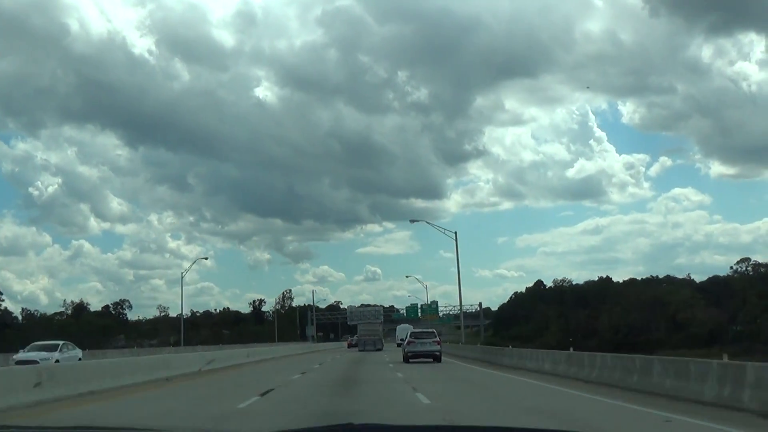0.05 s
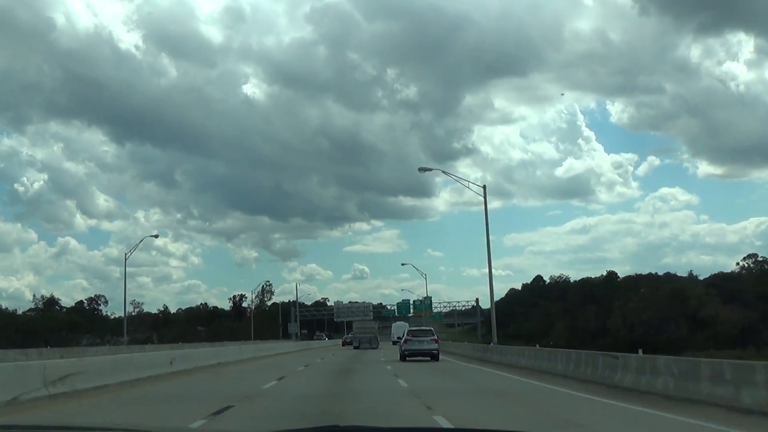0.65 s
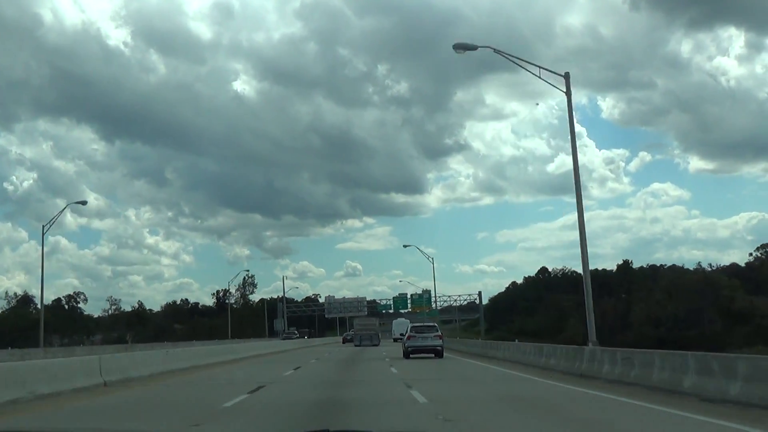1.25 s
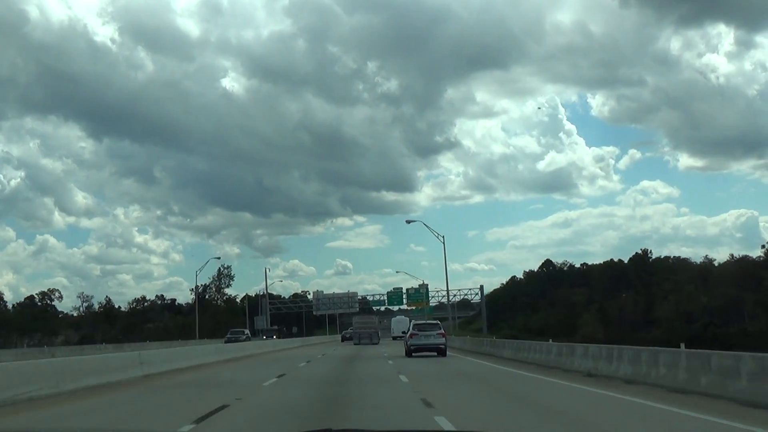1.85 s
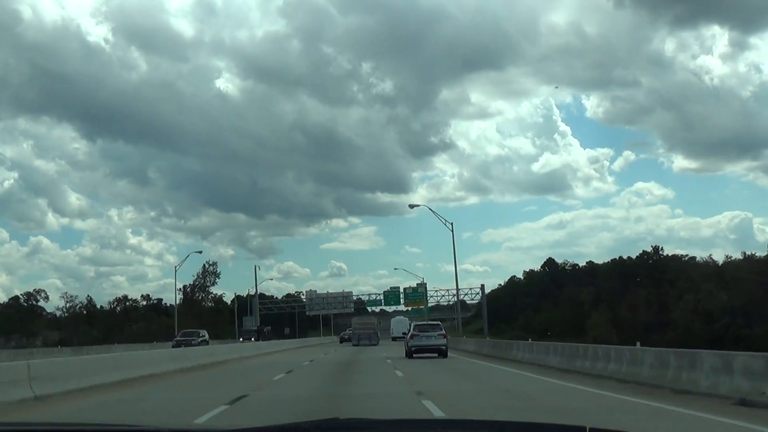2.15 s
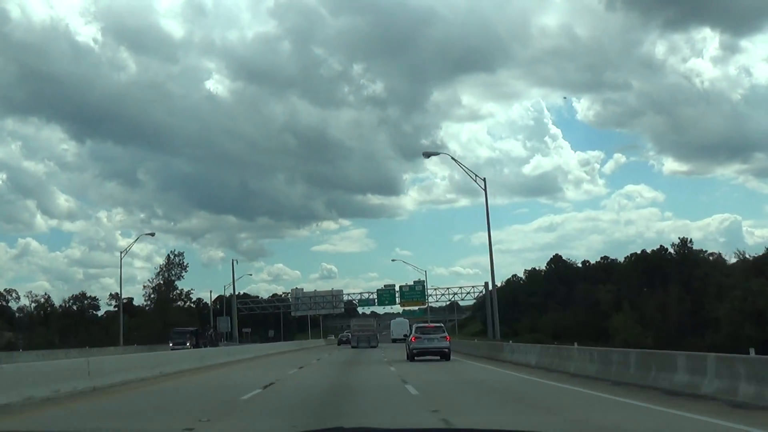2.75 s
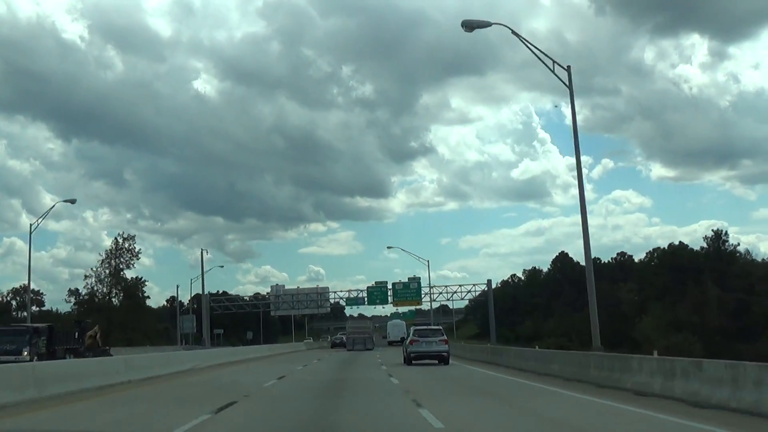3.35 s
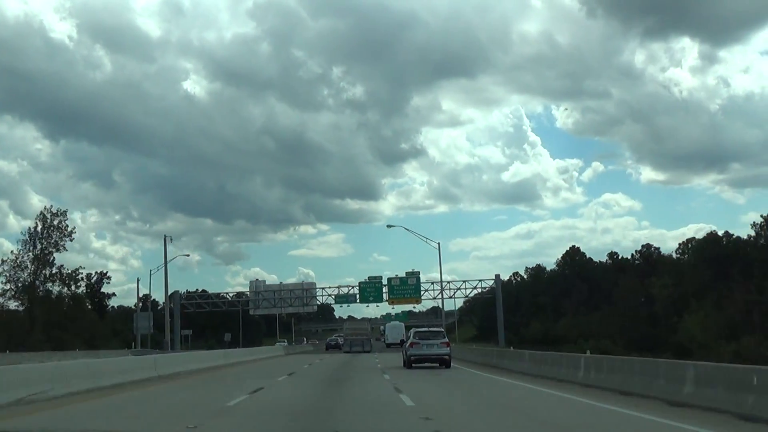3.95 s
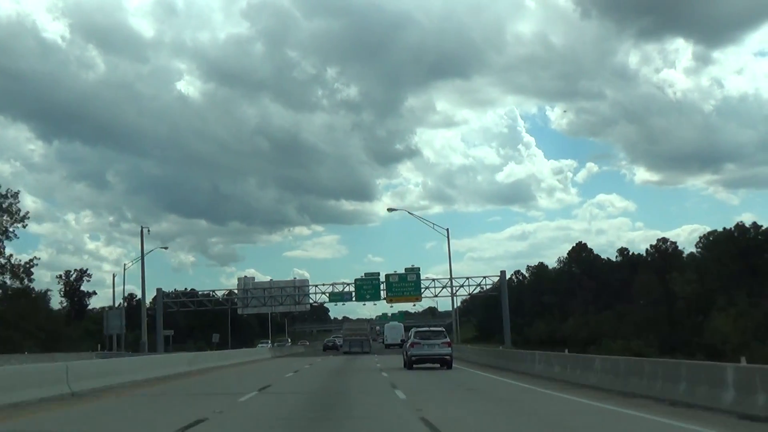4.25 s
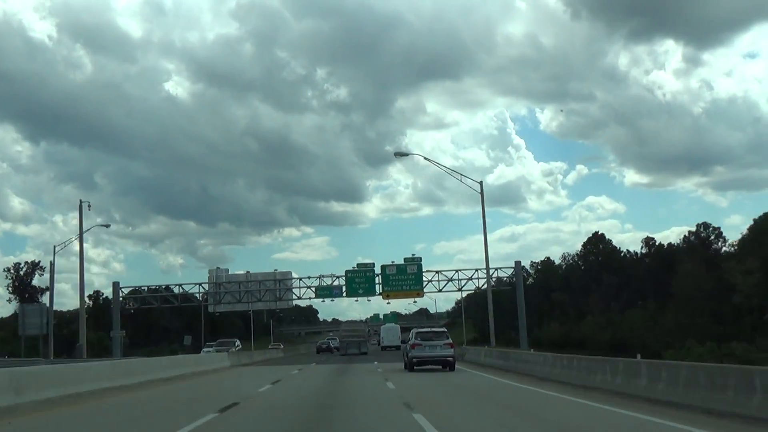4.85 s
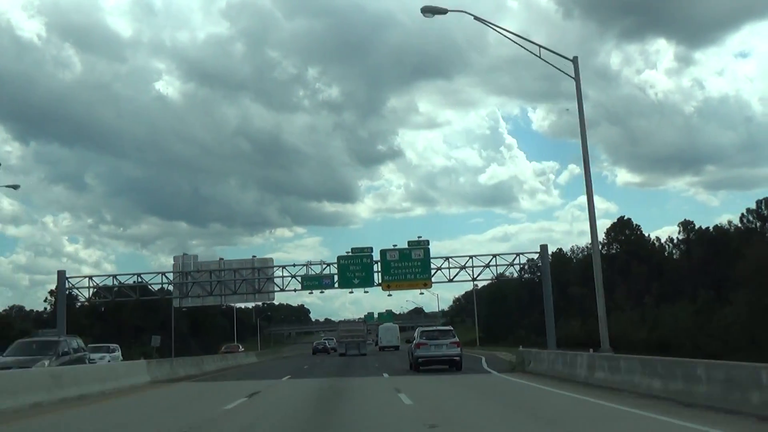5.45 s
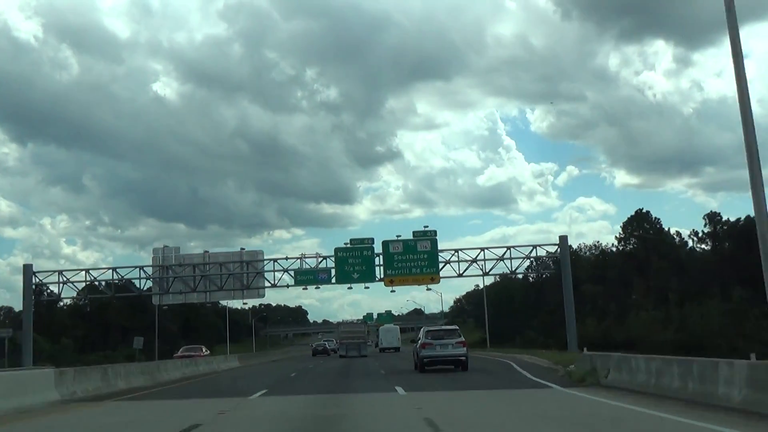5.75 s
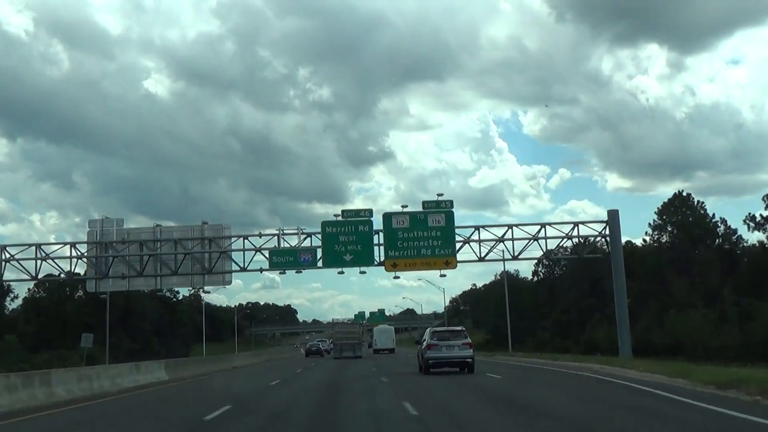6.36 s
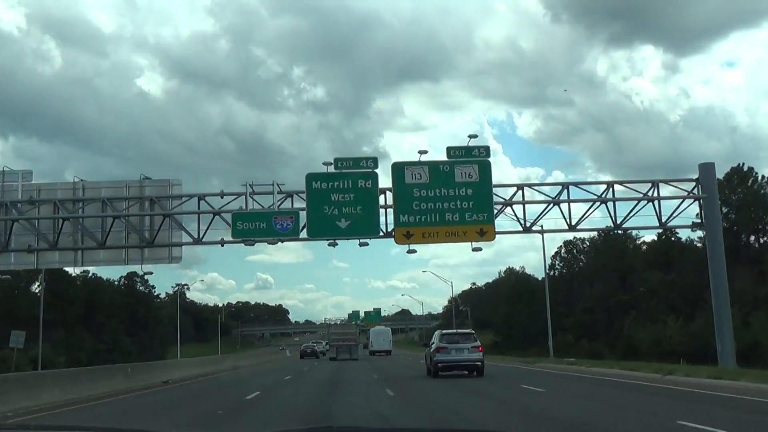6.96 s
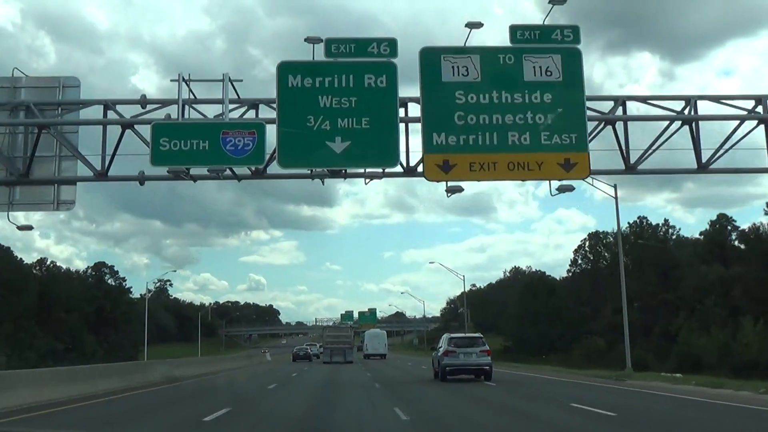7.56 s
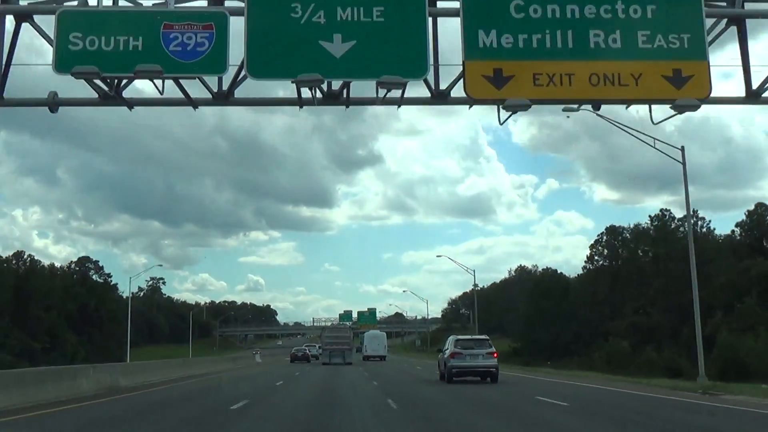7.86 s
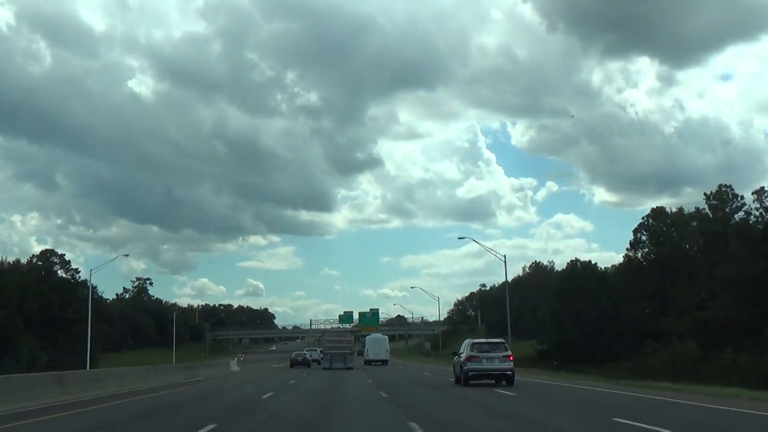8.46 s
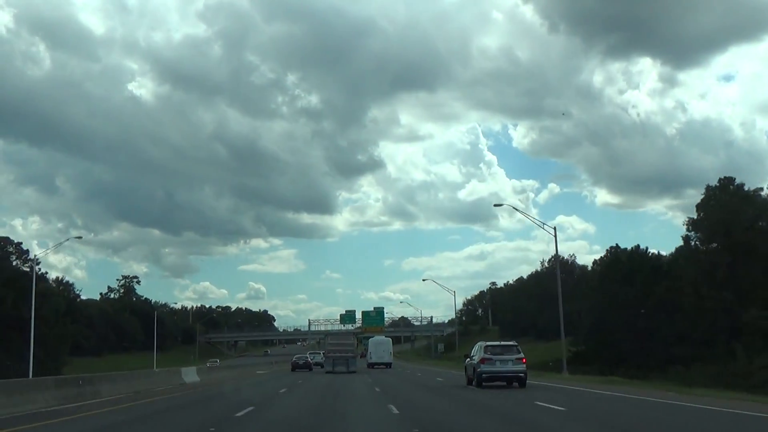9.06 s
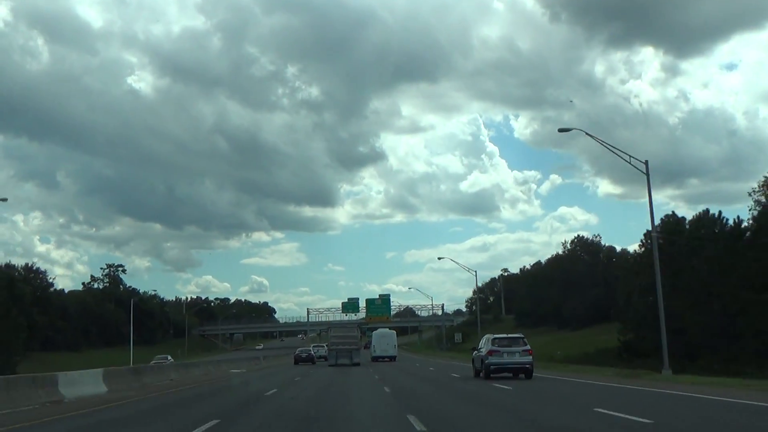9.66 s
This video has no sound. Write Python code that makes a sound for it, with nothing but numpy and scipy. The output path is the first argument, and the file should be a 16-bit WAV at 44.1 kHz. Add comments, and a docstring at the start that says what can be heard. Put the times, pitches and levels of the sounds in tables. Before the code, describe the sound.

Inside a fast-moving car, tyres sing on concrete, bump over joints, then roar lower on asphalt while loose plastic ticks lightly.

```python
"""Inside a car at highway speed

The road shakes the body into a low boom and rumble. The tyres sing on concrete, slap over its joints,
then roll onto asphalt, which roars lower and duller. The air inside them rings in swells. A faint
drivetrain whine climbs as the car pulls, air hisses past the glass, and loose trim rustles and ticks."""
import sys
import numpy as np
from scipy import signal
from scipy.fft import rfft, irfft, next_fast_len
from scipy.io import wavfile
from scipy.ndimage import uniform_filter1d

SR = 44100
rng = np.random.default_rng(int(sys.argv[2]) if len(sys.argv) > 2 else 0)


def to_wav(s):
    """Save 16-bit WAV."""
    ch = np.atleast_2d(s).T  # columns
    pcm = np.round(np.clip(ch, -1, 1) * 32767)  # PCM
    wavfile.write(sys.argv[1], SR, pcm.astype(np.int16))


N = 427769
T = np.arange(N) / SR
FFT_SIZE = next_fast_len(N + 8192, real=True)
HZ = np.maximum(np.arange(FFT_SIZE // 2 + 1) * SR / FFT_SIZE, 1)
AXLE_LAG_S, CROSSING_S = 0.1, 0.025   # rear wheels' delay; time for an axle to change surface
FRONT_SHARE = 0.82   # of the road noise's power

# Tone colour of each road surface: freq_hz, level_db
CONCRETE_COLOUR = [(18, -3), (35, -12), (100, -4.5), (200, -11.5), (300, -10), (370, -14.5), (800, -15.5),
                   (1300, -24), (1750, -26.5), (2300, -37.5), (3500, -46), (5000, -54.5), (10000, -60),
                   (15500, -64.5)]
ASPHALT_COLOUR = [(18, -14), (35, -4), (100, 1.5), (200, -8.5), (300, -4.5), (370, -18.5), (800, -20.5),
                  (1300, -37), (1750, -41.5), (2300, -43.5), (3500, -51), (5000, -56), (10000, -60.5),
                  (15500, -63.5)]
# Resonances of cabin air, tyre cavity and panels: centre_hz, width_hz, lift_db
CABIN_RESONANCES = [(64.3, 19, 6.5), (122, 54, 5.5), (143.6, 16, 5.5), (183.6, 27.5, 9), (231.8, 74, 9.5),
                    (303.7, 21.4, 4), (421, 33, 4.5), (469.4, 32, 4.5), (568, 60, 4), (751, 20, 4),
                    (855, 23, 3.5), (1070, 57, 3), (1288, 120, 8), (3990, 300, 3.5)]
# The mix on concrete, grooved concrete, then asphalt:
# start_s, boom_db, rumble_db, roar_db, sing_db, hiss_db, groove_db
ROAD_STRETCHES = [(0, -23.5, -20.5, -29, -34.2, -46, -38.5), (5.0, -24, -20.5, -28, -33, -47, -31.5),
                  (6.5, -24.5, -17, -23, -38.7, -54, -68)]
# Undulations that load (+) or ease (-) the suspension: middle_s, length_s, boom_lift_db, rumble_lift_db
ROAD_BUMPS = [(.73, 0.19, 1, 5), (1.05, 0.49, 2.5, 2.5), (1.38, 0.24, 6, 0), (1.54, .2, 1, 3),
              (1.86, 0.22, -3, -3.5), (2.24, 0.29, 0, 3), (2.92, .16, 6, 0.5), (3.6, 0.37, 3.5, 3),
              (4.22, 0.53, 0.5, 2.5), (5.12, 0.44, 2, 2.5), (5.78, .3, 3, 4), (6.44, .25, 3.5, 4.5),
              (6.63, 0.24, 7.5, 1.5), (7.04, 0.21, 0, 2.5), (7.45, 0.17, 3, 0.5), (8.0, 0.52, -2, 1.5),
              (8.88, 0.42, 5, 0)]
# Coarser (+) or smoother (-) patches under the tread: middle_s, length_s, roar_lift_db, sing_lift_db
ROAD_PATCHES = [(.92, 0.58, 2, 1), (2.05, .2, 2.5, 1), (2.58, 0.29, 1, 3.5), (2.82, .15, -2, -5),
                (3.45, 0.24, -0.5, 3.5), (4.21, 0.21, 2.5, 3), (5.27, .25, 0, 3), (5.75, 0.28, 2, .5),
                (6.62, .24, -4.5, 1), (6.95, 0.38, 1.2, -1), (8.82, 0.42, 2, -0.5), (9.35, 0.28, 1.3, 2)]
# Narrow tones of the tread on concrete: pitch_hz, width_hz, level_db
TREAD_TONES = [(837, 106, 1.5), (954, 20, 1.5), (1001, 21, 5.5), (1098, 28, -1.5), (1300, 55, 4.5),
               (1410, 55, -2), (1494, 44, -0.5), (1667, 43, -8), (1810, 36, -2.5)]
# The drivetrain's climb: time_s, pitch_hz, level_db
WHINE_CURVE = [(0, 233.3, -40), (4.6, 247.1, -37.5), (5.1, 250.5, -35), (5.8, 259.6, -28), (6.3, 263, -45),
               (6.8, 298.4, -31), (7.3, 314, -34), (7.9, 327.5, -35), (8.7, 332.3, -38.5), (9.7, 342, -39)]
# Swells of the ring inside the tyres: time_s, level_db
TYRE_RING_CURVE = [(0, -29), (.75, -24.5), (1.15, -30), (1.5, -24), (1.95, -25.5), (2.4, -40), (3.35, -50),
                   (3.75, -23.5), (4.2, -37.5), (9.7, -58)]
# Spells of trim rubbing: middle_s, length_s, level_db
TRIM_RUBS = [(1.0, .68, -61.5), (2.2, .5, -65), (3.48, 0.26, -60), (4.65, 0.51, -62), (6.5, .32, -65),
             (8.38, .5, -63), (9.35, 0.29, -67)]
# Tone colour of the rubbing: freq_hz, level_db
RUB_COLOUR = [(3000, -25), (6000, 0), (8500, -8), (10400, -2), (12000, -5), (15500, -19)]
# Touches of loose trim: start_s, level_db, main_hz, falloff_db_per_octave
TRIM_TICKS = [(1.795, -61, 13000, 20), (2.295, -37, 2750, 34), (3.111, -42, 2900, 20),
              (3.507, -45, 5700, 7), (3.758, -38, 2800, 30), (7.032, -45, 2500, 22),
              (7.095, -42.5, 3730, 8), (7.2073, -33.5, 3700, 8), (8.029, -48.5, 3900, 20),
              (8.424, -47, 5590, 3), (8.576, -47, 5600, 9), (9.229, -47, 6000, 6), (9.394, -51, 12000, 12),
              (9.4275, -36, 4600, 5), (9.550, -44, 4200, 14), (9.559, -33, 3700, 4), (9.562, -34, 2200, 6),
              (9.571, -39, 4000, 14), (9.5775, -32, 5600, 4), (9.663, -41, 9000, -1)]
# Ringing modes of the trim: pitch_hz, level_db, t60_s
TRIM_MODES = [(1650, 0, .008), (2140, -3, .01), (2780, -3.5, 0.005), (3750, -3, 0.0064), (4190, -1.5, 0.01),
              (4760, -11, 0.0057), (5670, -5, 0.0035), (7140, -9, 0.0034), (8800, -6, 0.0056),
              (10470, -5.5, .005), (12300, -5, .004), (14200, -16, .003)]
# Joints across the road: start_s, slap_hz, front_slap_db, rear_slap_db, front_thud_db, rear_thud_db
ROAD_JOINTS = [(2.064, 580, -15.5, -20, -15.5, -21.5), (2.765, 454, -43, -35, -10, -16),
               (5.002, 490, -19.5, -20.5, -29, -17.5), (6.477, 860, -20, -41, -22, -31)]
# Stereo width of the noise layers: freq_hz, side_minus_mid_db
STEREO_WIDTH = [(25, -17), (65, -31), (150, -24), (380, -18.5), (800, -22.5), (1600, -21), (3200, -24),
                (4600, -23), (5400, -10.5), (6800, -7.5), (10000, -13), (13000, -18), (15500, -26)]
# Balance at the dashboard: freq_hz, left_minus_right_db
STEREO_BALANCE = [(20, -13), (45, -13), (75, -10), (110, -7.5), (160, -3), (270, 1), (400, -2), (700, -0.5),
                  (3000, 0)]


def from_db(db):
    """Decibels to gain."""
    return 10 ** (np.asarray(db) / 20)


def unit_rms(x):
    """Scale to an rms of 1."""
    return x / np.sqrt(np.mean(x ** 2))


def automation(rows):
    """Each column of a timed curve, drawn through every sample."""
    time_s, *columns = np.transpose(rows)
    return [np.interp(T, time_s, column) for column in columns]


def eq_curve(points):
    """An EQ curve in dB, its points joined on a log frequency axis."""
    freq_hz, level_db = np.transpose(points)
    return np.interp(np.log(HZ), np.log(freq_hz), level_db)


def bell(centre_hz, width_hz):
    """The bell of one resonance, 1 at its peak."""
    return 1 / (1 + (2 * (HZ - centre_hz) / width_hz) ** 2)


def band(low_hz, high_hz):
    """Gain of a steep band-pass."""
    return 1 / np.sqrt((1 + (low_hz / HZ) ** 16) * (1 + (HZ / high_hz) ** 16))


def drift(rate_hz):
    """Smooth random wander, rms 1."""
    knots = rng.standard_normal(int(rate_hz * N / SR) + 3)
    return unit_rms(np.interp(T * rate_hz, np.arange(len(knots)), knots))


def noise(colour):
    """Coloured noise as mid and side, the mid at rms 1."""
    white = rfft(rng.standard_normal((2, FFT_SIZE)))
    width = [np.ones_like(HZ), from_db(eq_curve(STEREO_WIDTH))]
    pair = irfft(white * colour * width, FFT_SIZE)[:, :N]
    return pair / np.std(pair[0])


def levelled(channels, window_s):
    """Ride the gain to hold the first channel near rms 1."""
    return channels / np.sqrt(uniform_filter1d(channels[0] ** 2, int(window_s * SR)))


def crossfade(start_s):
    """Share of the tyres' power that has crossed onto a new stretch: front wheels, then rear."""
    front, rear = (np.clip((T - s) / CROSSING_S + 0.5, 0, 1) for s in (start_s, start_s + AXLE_LAG_S))
    return FRONT_SHARE * front + (1 - FRONT_SHARE) * rear


def road_faders():
    """Gains of boom, rumble, roar, sing, hiss and grooves; each stretch takes over from the last."""
    power = from_db(ROAD_STRETCHES[0][1:])[:, None] ** 2
    for start_s, *levels_db in ROAD_STRETCHES[1:]:
        crossed = crossfade(start_s)
        power = (1 - crossed) * power + crossed * from_db(levels_db)[:, None] ** 2
    return np.sqrt(power)


def lifts(features):
    """Each bump or patch comes and goes as the car runs over it; two curves in dB."""
    curves_db = np.zeros((2, N))
    for middle_s, length_s, *lift_db in features:
        over = np.abs(T - middle_s) < length_s / 2
        curves_db[:, over] += np.outer(lift_db, np.cos(np.pi * (T[over] - middle_s) / length_s))
    return curves_db


def road_bed(concrete, asphalt, gains):
    """Road and air noise: the surface sets the colour, bumps push the bass, coarse patches the mids."""
    on_asphalt = crossfade(ROAD_STRETCHES[-1][0])

    def register(low_hz, high_hz):
        """One band of the bed, passing from concrete to asphalt."""
        passband = band(low_hz, high_hz)
        return (np.sqrt(1 - on_asphalt) * noise(concrete * passband)
                + np.sqrt(on_asphalt) * noise(asphalt * passband))

    boom_db, rumble_db = lifts(ROAD_BUMPS)
    roar_db, sing_db = lifts(ROAD_PATCHES)
    boom = from_db(boom_db + 1.2 * drift(14)) * levelled(register(16, 98.4), window_s=0.16)
    rumble = from_db(rumble_db + 0.74 * drift(14)) * levelled(register(96.7, 380), window_s=0.11)
    roar = from_db(roar_db + 0.5 * drift(12)) * levelled(register(355, 1113), window_s=0.09)
    sing = from_db(sing_db + 1.05 * drift(15)) * register(1010, 2020)
    hiss = from_db(0.25 * sing_db + 0.65 * drift(30)) * register(2113, 18000)
    return sum(gain * layer for gain, layer in zip(gains, (boom, rumble, roar, sing, hiss)))


def groove_tones():
    """Tread blocks drumming on grooved concrete give narrow, fluttering tones."""
    return noise(sum(from_db(db) * bell(hz, width_hz) for hz, width_hz, db in TREAD_TONES))


def wavering_tone(pitch_hz, level_db, waver_hz, flutter_db):
    """A sine, unsteady in pitch and level."""
    phase = 2 * np.pi * np.cumsum(pitch_hz + waver_hz * drift(12)) / SR
    return from_db(level_db + flutter_db * drift(9)) * np.sqrt(2) * np.sin(phase)


def drivetrain_whine():
    """The turning drivetrain gives one thin tone that climbs as the car pulls."""
    pitch_hz, level_db = automation(WHINE_CURVE)
    return wavering_tone(pitch_hz, level_db, waver_hz=0.89, flutter_db=1.5)


def tyre_ring(pitch_hz=189.1):
    """The air inside the tyres rings on one low note that swells and fades."""
    level_db, = automation(TYRE_RING_CURVE)
    return wavering_tone(pitch_hz, level_db, waver_hz=2.98, flutter_db=0.5)


def trim_rustles():
    """Trim rubs softly in brief spells of fine, bright grain."""
    envelope = np.zeros(N)
    for middle_s, length_s, level_db in TRIM_RUBS:
        position = 2 * (T - middle_s) / length_s - 1
        envelope += from_db(level_db) * np.sqrt(np.maximum(1 - position ** 2, 0))
    grain = unit_rms(from_db(3.2 * drift(150)))
    return envelope * grain * noise(from_db(eq_curve(RUB_COLOUR)) * band(2940, 18000))


def trim_ticks(side_db=-17):
    """Loose plastic touches in a tiny scuff, which rings the trim's modes; mid and side."""
    track, t = np.zeros((2, FFT_SIZE)), T[:SR // 20]
    mode_hz, mode_db, t60_s = np.transpose(TRIM_MODES)
    rings = np.sin(2 * np.pi * mode_hz[:, None] * t) * from_db(-60 * t / t60_s[:, None])
    contact = np.exp(-t / 0.0011) + 0.054 * np.exp(-t / 0.01)   # the scuff and the cabin's short echo
    for start_s, level_db, main_hz, falloff in TRIM_TICKS:
        scuffs = contact * rng.standard_normal((2, len(mode_hz), len(t)))
        modes = signal.fftconvolve(scuffs, rings[None], axes=-1)[..., :len(t)]
        modes /= np.linalg.norm(modes, axis=-1, keepdims=True)
        octaves_away = np.abs(np.log2(mode_hz / main_hz))
        tick = from_db(mode_db - falloff * octaves_away) @ modes
        tick /= np.sqrt(np.sum(tick[0] ** 2) / (0.003 * SR))   # the energy of 3 ms at rms 1
        at = int(start_s * SR)
        track[:, at:at + len(t)] += from_db([[level_db], [level_db + side_db]]) * tick
    return track[:, :N]


def blow(start_s, rise_s):
    """Envelope of a hit that builds to 1 and dies away."""
    age = np.maximum(T - start_s, 0) / rise_s
    return age * np.exp(1 - age)


def joint_hits(body_colour, floor_cutoff_hz=1700):
    """Each joint gives the tread a short slap and the body a longer thud, once for each axle."""
    slaps, thud_envelope = np.zeros((2, N))
    for start_s, slap_hz, front_slap_db, rear_slap_db, front_thud_db, rear_thud_db in ROAD_JOINTS:
        tread = signal.butter(2, [slap_hz / 1.9, slap_hz * 1.12], "band", fs=SR, output="sos")
        knock = levelled(signal.sosfilt(tread, rng.standard_normal((1, N))), window_s=0.011)[0]
        front = start_s, front_slap_db, front_thud_db
        rear = start_s + AXLE_LAG_S, rear_slap_db, rear_thud_db
        for hit_s, slap_db, thud_db in front, rear:
            slaps += from_db(slap_db) * blow(hit_s, rise_s=0.0098) * knock
            thud_envelope += from_db(thud_db) * blow(hit_s, rise_s=0.028)
    carpeted_floor = signal.butter(2, floor_cutoff_hz, fs=SR, output="sos")
    boom = levelled(noise(body_colour * band(80, 161)), window_s=0.033)[0]
    return signal.sosfilt(carpeted_floor, slaps) + thud_envelope * boom


def scene():
    """Everything meets at the dashboard, where the bass leans to the right."""
    cabin_db = sum(db * bell(hz, width_hz) for hz, width_hz, db in CABIN_RESONANCES)
    concrete = from_db(eq_curve(CONCRETE_COLOUR) + cabin_db)
    asphalt = from_db(eq_curve(ASPHALT_COLOUR) + cabin_db)
    *bed_gains, groove_gain = road_faders()
    road = road_bed(concrete, asphalt, bed_gains) + groove_gain * groove_tones()
    mid, side = road + trim_rustles() + trim_ticks()
    mid += drivetrain_whine() + tyre_ring() + joint_hits(concrete)
    left_over_right = from_db(eq_curve(STEREO_BALANCE))
    pan = (left_over_right - 1) / (left_over_right + 1)
    side += irfft(rfft(mid, FFT_SIZE) * pan, FFT_SIZE)[:N]
    return np.array([mid + side, mid - side])


def record(dry):
    """A steep low-pass takes off the very top."""
    cutoff_hz = 15750
    return irfft(rfft(dry, FFT_SIZE) / np.sqrt(1 + (HZ / cutoff_hz) ** 400), FFT_SIZE)[:, :N]


dry = scene()
out = record(dry)
to_wav(out)
```